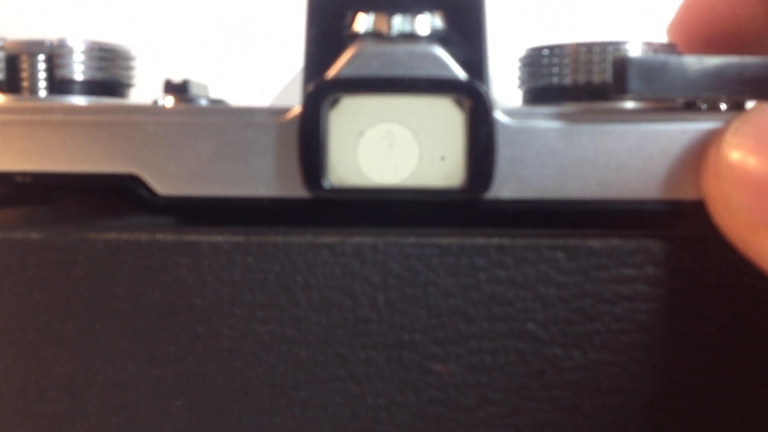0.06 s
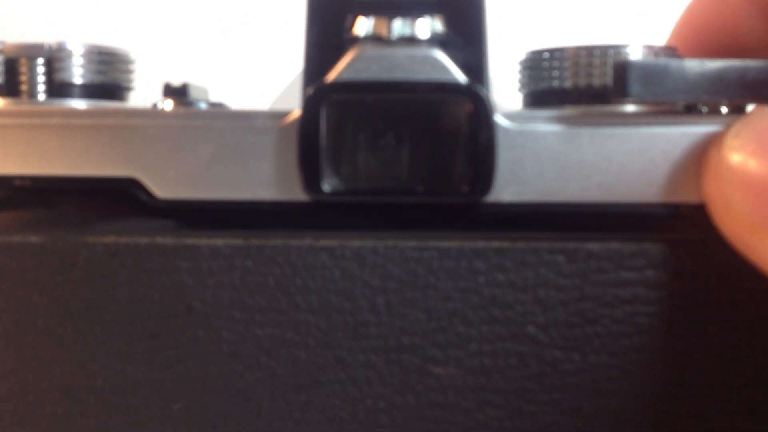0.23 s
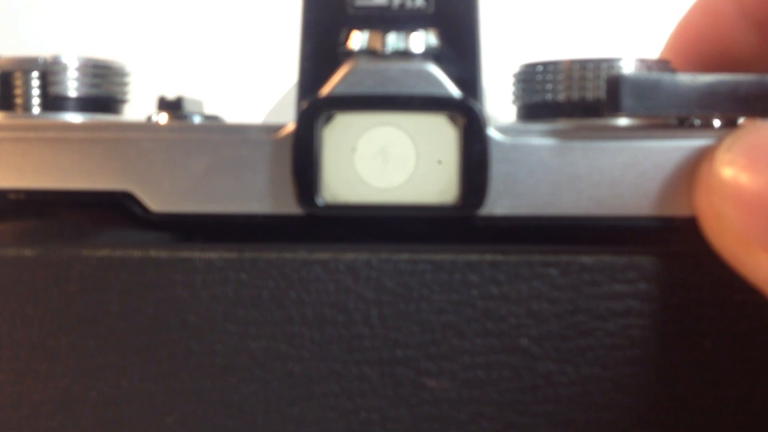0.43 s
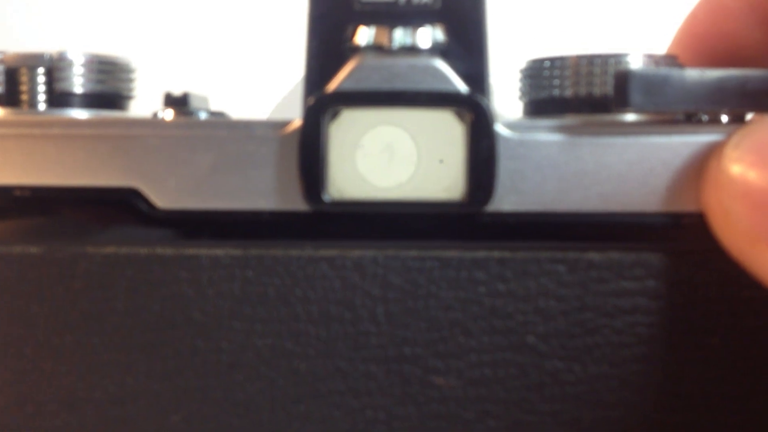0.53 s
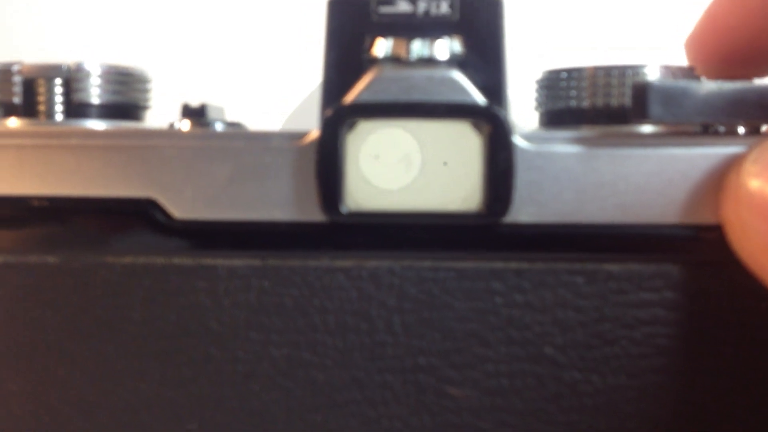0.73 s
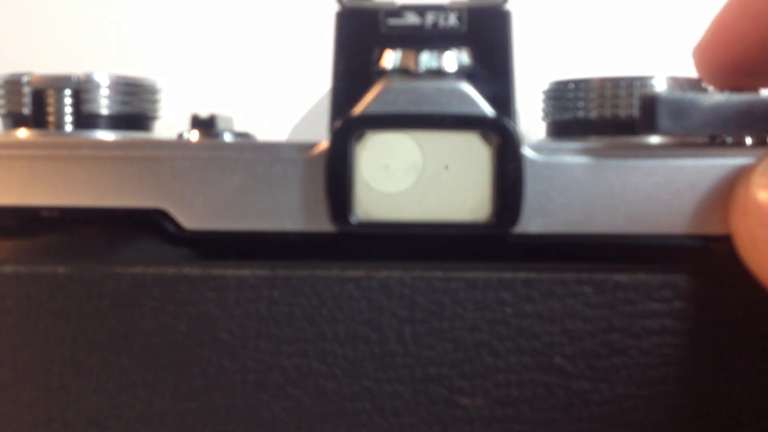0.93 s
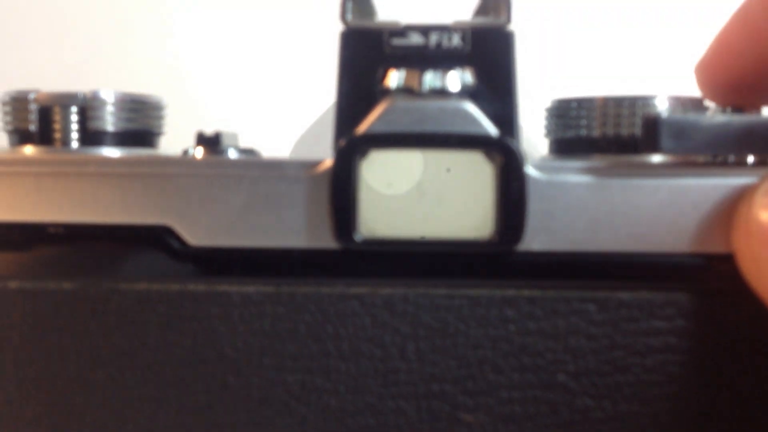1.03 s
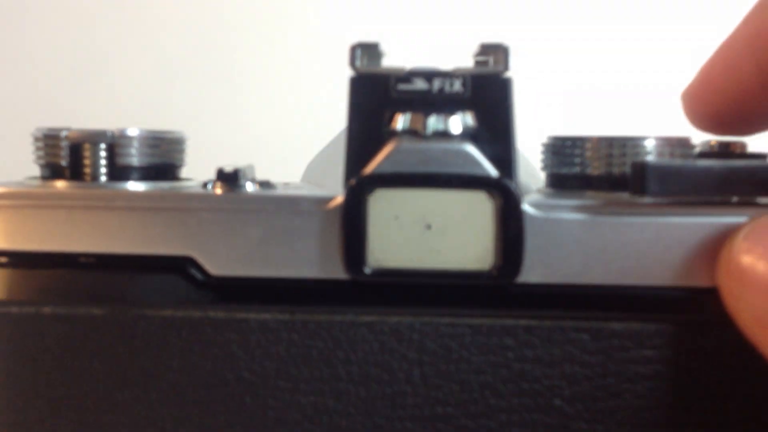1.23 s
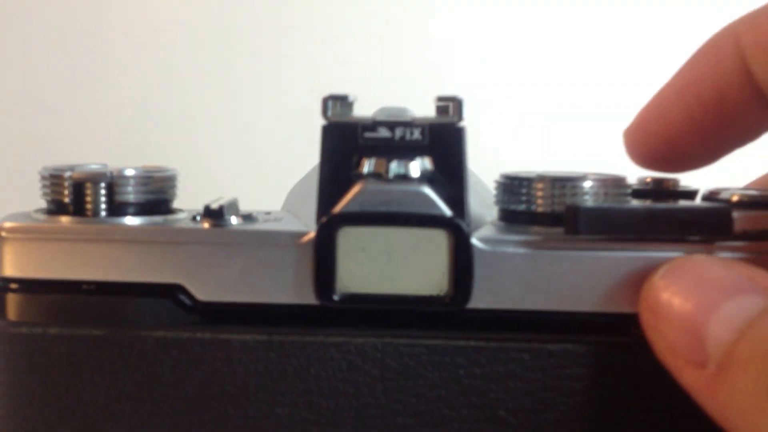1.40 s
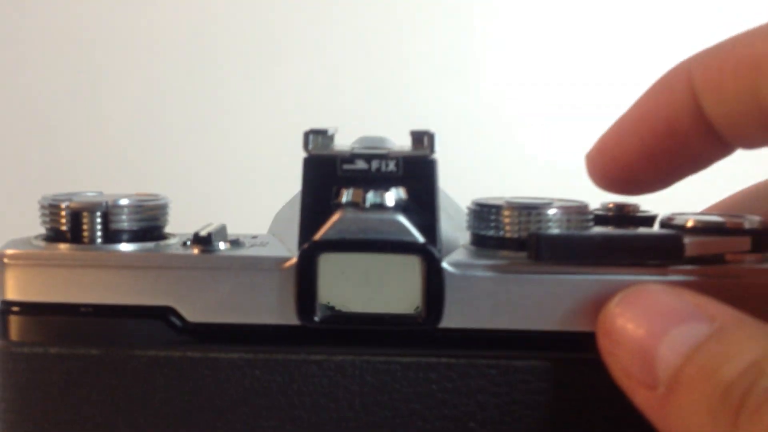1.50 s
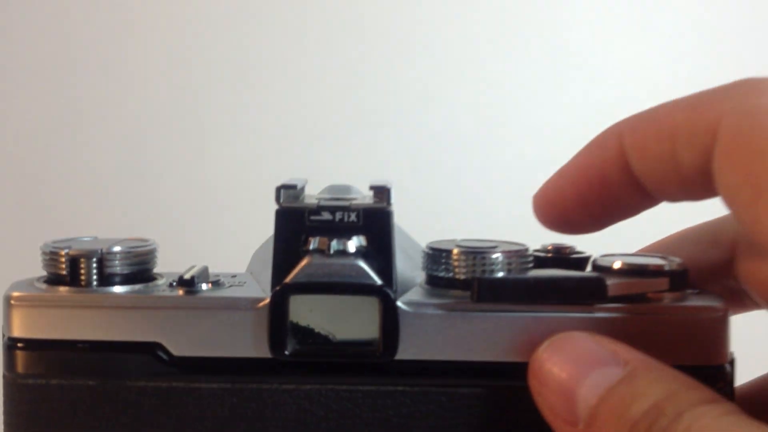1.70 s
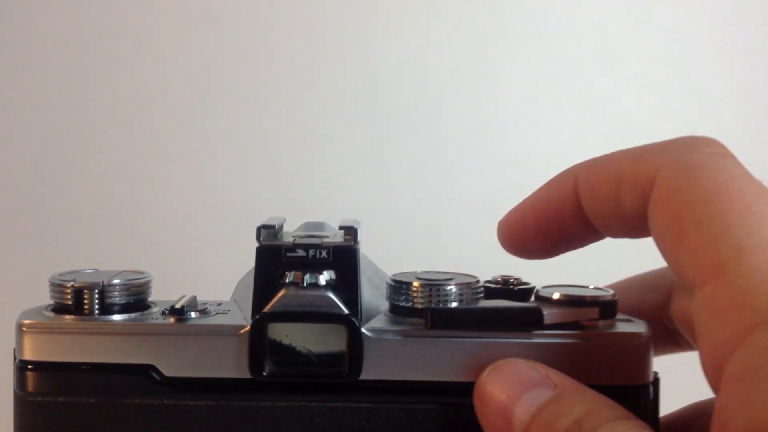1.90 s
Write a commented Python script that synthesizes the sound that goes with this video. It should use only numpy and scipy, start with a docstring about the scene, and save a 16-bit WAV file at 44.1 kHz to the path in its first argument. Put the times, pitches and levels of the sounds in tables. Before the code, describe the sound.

A film camera shutter fires with a loud metallic clack, then a lighter click follows

```python
"""Film camera shot in a small room

A film camera fires close to the microphone: the mirror flips up, the shutter runs and the mirror drops
back with a thump. The release button springs back with a lighter click, and fingers tick on the body
and nudge the advance lever. Each contact is a burst of filtered noise, a metal ring and a low thump.
Noise pulses make the gear whirr; noise and long tones make the return spring's shiver.
A noise tail makes the room, and an appliance hums quietly behind in sine tones over soft noise."""
import sys
import numpy as np
from scipy import signal
from scipy.fft import rfft, irfft, next_fast_len
from scipy.io import wavfile
from scipy.ndimage import uniform_filter1d

SR = 44100
rng = np.random.default_rng(int(sys.argv[2]) if len(sys.argv) > 2 else 0)


def bounce(signal):
    """Save signal as a 16-bit WAV file at the path given by the first command-line argument."""
    frames = np.transpose(np.atleast_2d(signal))
    limited = np.clip(frames, -1, 1)
    pcm = np.round(limited * 32767).astype(np.int16)
    wavfile.write(sys.argv[1], SR, pcm)


N = 85995  # length in samples


def amp(db):
    """Turn decibels into a gain."""
    return 10 ** (np.asarray(db) / 20)


def unit(x):
    """Scale to an rms of 1."""
    return x / np.sqrt(np.mean(x ** 2) + 1e-20)


def along(points, hz):
    """Read values between (pitch_hz, value) points on a log pitch axis."""
    point_hz, values = np.transpose(points)
    return np.interp(np.log(hz + 1), np.log(point_hz + 1), values)


def fade(t, t60):
    """Die away smoothly, falling 60 dB in t60 seconds."""
    return np.exp(-np.log(1000) * t / t60)


def causal(x, gain):
    """Minimum-phase filter, which responds as early as it can; gain spans 0 Hz to SR / 2."""
    size = 2 * (len(gain) - 1)
    cepstrum = irfft(np.log(gain + 1e-6))
    # fold the second half onto the first, so that nothing sounds before its cause
    cepstrum[1:size // 2] *= 2
    cepstrum[size // 2 + 1:] = 0
    response = np.exp(rfft(cepstrum))
    return irfft(rfft(x, size) * response)[:len(x)]


def coloured(x, spectrum):
    """Filter x to the shape of a spectrum, with a filter of unit power."""
    hz = np.fft.rfftfreq(2 * next_fast_len(len(x)), 1 / SR)
    return causal(x, unit(amp(along(spectrum, hz))))


def ring(modes, t, scatter_db):
    """Sum damped sines of alternating sign, each struck with a slightly random strength."""
    out = np.zeros(len(t))
    for k, (hz, db, t60) in enumerate(modes):
        strength = (-1) ** k * amp(db + scatter_db * rng.normal())
        out += strength * fade(t, t60) * np.sin(2 * np.pi * hz * t)
    return out


def add(track, s, sound):
    """Mix a sound into the track at s seconds."""
    i = int(s * SR)
    track[i:i + len(sound)] += sound[:len(track) - i]


# Appliance hum tones: pitch_hz, level_db (rms)
HUM_TONES = [(360, -90), (436, -87.5), (480, -78.5), (600, -85), (640, -88), (720, -72.5), (787, -92),
             (840, -85), (960, -91.5)]
# Colour of the soft room noise: pitch_hz, relative_level_db
AIR_COLOUR = [(25, -32.5), (75, -33.5), (130, -6.5), (230, -4), (330, -6.5), (450, -7), (700, -7.5),
              (950, -11.5), (1300, -11.5), (3000, -14.5), (6000, -14), (10000, -18.5), (12500, -14.5),
              (15000, -17)]
AIR_DB = -70


def background():
    """Steady hum tones, each starting at a random point of its cycle, over soft room noise."""
    t = np.arange(N) / SR
    hum = np.zeros(N)
    for hz, db in HUM_TONES:
        tone = np.sin(2 * np.pi * (hz * t + rng.random()))
        hum += np.sqrt(2) * amp(db) * tone  # sqrt(2) turns rms into peak
    return hum + amp(AIR_DB) * coloured(rng.standard_normal(N), AIR_COLOUR)


EVEN_HZ = 313  # a crack's spectrum is even over bands of this width


def burst(t, t60):
    """A dying burst of dense vibration, evened out so that it has no colour of its own."""
    noise = rng.standard_normal(len(t)) * fade(t, t60)
    power = np.abs(rfft(noise, 2 * len(t))) ** 2
    smooth_power = uniform_filter1d(power, int(2 * EVEN_HZ * len(t) / SR))
    return causal(noise, unit(np.abs(smooth_power) ** -.5))


# Contacts inside the camera: start_s, level_db, t60_s, thump_db (relative to level_db), part (a name)
CONTACTS = [ (0.1772, -51.5, 0.0347, -3.5, "finger"), (0.2160, -19, 0.04, -27.5, "mirror"),
            (0.2234, -14.5, 0.048, -31.5, "mirror"), (0.2290, -22.5, .04, -25, "mirror"),
            (0.2432, -37, .02, -27.5, "mirror"), (0.2532, -22.5, 0.023, -22.5, "mirror"),
            (0.2744, -10.5, .022, -30.5, "curtain"), (0.2767, -6, 0.013, -38, "curtain"),
            (0.3049, -18.5, 0.075, -31, "stop"), (0.3120, -11.5, 0.022, -17, "stop"),
            (0.3269, -20.5, 0.077, -10, "rebound"), (0.3353, -38, .025, -11, "rebound"),
            (0.423, -37, 0.028, -25.5, "tick"), (0.4400, -52, 0.036, -19.5, "tick"),
            (0.4865, -57.5, .1, -17.5, "finger"), (0.509, -60.5, .03, -7, "tick"),
            (0.6563, -29, 0.011, -25.5, "button"), (0.6580, -14.5, 0.014, -30.5, "button"),
            (0.6610, -19.5, 0.012, -39.5, "button"), (1.6640, -46, 0.011, -25.5, "tick"),
            (1.7280, -56.5, 0.022, -28, "tick"), (1.9025, -38, 0.075, -24, "lever"),
            (1.9250, -48.5, 0.13, -24, "lever")]
# Colour of each part's dense, short ring, by part name: pitch_hz, relative_level_db (per Hz)
PART_COLOURS = { "mirror": [(120, -29), (200, -13), (338, -21.5), (503, -5.5), (636, -10), (833, -4.5),
                (1260, -8.5), (1690, -11), (2130, -13.5), (2380, -3), (3540, -9), (3800, -4.5), (4720, -4),
                (5070, -6.5), (7020, -5), (8120, -13), (8720, -9), (13500, -11.5), (15000, -21)],
                "curtain": [(120, -46), (200, -19), (696, -17.5), (980, 1.5), (1240, -12), (1720, -11.5),
                (2290, 1), (3290, -6.5), (4010, -8), (4240, -9), (4720, 5), (5070, -6), (5450, 5.5),
                (5860, -5), (7830, -5.5), (9210, 0.5), (10600, -6.5), (11400, -2.5), (15000, -21)],
                "stop": [(120, -54.5), (200, -13), (459, -15), (696, -17), (1240, -11), (1910, -22),
                (2460, -13.5), (2700, -11.5), (3060, -9), (3540, -12), (4160, -13.5), (4550, 2.5),
                (5170, -26.5), (5450, -16), (7830, -13), (8880, -6.5), (9550, -14), (13500, -15),
                (15000, -32)], "rebound": [(120, -37.5), (200, -10.5), (963, -8), (1260, -5.5),
                (1980, -12.5), (2330, -7), (2700, -19), (3410, -19.5), (3730, 4.5), (4090, -10),
                (4550, -9.5), (7150, -4.5), (8260, -14), (12700, -11), (15000, -16.5)],
                "button": [(120, -46), (200, -16), (376, -30), (591, -25), (1070, 1), (1430, -11.5),
                (2060, 1), (2510, -6.5), (3120, -11), (3350, -12), (4090, -1), (4550, 1), (6080, -2.5),
                (6530, 1), (7020, -3.5), (9210, 1.5), (10300, -9), (11200, 0.5), (15000, -18)],
                "lever": [(88, -29.5), (150, -9), (416, -0.5), (612, -1.5), (772, -10.5), (1130, -4.5),
                (1670, -10), (2650, -6.5), (2920, -12.5), (4540, -0.5), (5100, -10), (6180, -11.5),
                (6680, -4.5), (8100, -8), (10800, -23), (12100, -18), (15000, -31)], "tick": [(200, -16.5),
                (1000, -8), (2000, -5.5), (3500, -1), (6000, -2.5), (10000, -7), (15000, -16.5)],
                "finger": [(150, -17.5), (700, -1.5), (1200, 8.5), (1800, -6.5), (2700, -4.5), (4000, -8),
                (6000, -11), (14000, -24)]}
# Ring of the metal top plate and springs: pitch_hz, level_db (relative to the contact), t60_s
METAL_MODES = [(1423, -29, 0.11), (2351, -39, 0.088), (3070, -32.5, 0.069), (3743, -31.5, .09),
               (4300, -43.5, .12), (4480, -34, .11), (4540, -37.5, 0.1), (4735, -35.5, .1),
               (5620, -34.5, .09), (8340, -38, .1), (8630, -32.5, .11)]
# Low tones of the hollow body: pitch_hz, level_db (relative to the thump), t60_s
BODY_MODES = [(131.3, -5.5, 0.1), (155.7, -4, 0.095), (209.4, -10, 0.17), (334.9, -21, 0.24),
              (393, -20.5, .2), (447, -13.5, .25), (571, -7, 0.052)]
ATTACK_S, THUMP_ATTACK_S = 0.000398, 0.0034  # time constants of the rise


def contacts():
    """Each contact is a crack in its part's colour, a metal ring and a slower-rising thump of the body."""
    out, t = np.zeros(N), np.arange(SR // 2) / SR
    attack = 1 - np.exp(-t / ATTACK_S)
    thump_attack = 1 - np.exp(-t / THUMP_ATTACK_S)
    for s, db, t60, thump_db, part in CONTACTS:
        crack = coloured(burst(t, t60), PART_COLOURS[part])
        metal = ring(METAL_MODES, t, scatter_db=0.5)
        thump = amp(thump_db) * ring(BODY_MODES, t, scatter_db=0.1) * thump_attack
        add(out, s, amp(db) * ((crack + metal) * attack + thump))
    return out


# the timing gears run while the shutter is open
GEAR_START_S, GEAR_STOP_S, GEAR_RATE_HZ = .238, .303, 330
GEAR_DB, GEAR_T60_S = -35, 0.017


def gears():
    """A brief whirr: slightly uneven tooth clicks swell and fade a noise in the mirror's colour."""
    drive, t = np.zeros(N), np.arange(SR // 20) / SR
    for k, (late, size) in enumerate(rng.random((64, 2))):
        s = GEAR_START_S + (k + late / 2) / GEAR_RATE_HZ  # up to half a click late
        if s < GEAR_STOP_S:
            add(drive, s, (.5 + size) * fade(t, GEAR_T60_S))
    whirr = drive * rng.standard_normal(N)
    return amp(GEAR_DB) * coloured(whirr, PART_COLOURS["mirror"])


# Faint, long tones of the return spring: pitch_hz, level_db (starting peak), t60_s
SPRING_TONES = [(433, -62.5, 1.2), (641, -65, 1.6), (788, -66.5, 1.2), (2125, -58, .6)]
# Colour of the spring's shiver: pitch_hz, relative_level_db (per Hz)
SPRING_COLOUR = [(100, -7.5), (200, -5.5), (450, -2), (700, -8), (1200, 0.5), (1800, -7.5), (2400, -7.5),
                 (4500, -1), (6000, -4), (9000, -3), (15000, -14.5)]
SPRING_START_S, SHIVER_DB, SHIVER_T60_S = .33, -41.5, 0.3


def spring():
    """The return spring shivers densely after the mirror drops, then sings faintly in a few long tones."""
    out, t = np.zeros(N), np.arange(SR) / SR
    noise = rng.standard_normal(len(t)) * fade(t, SHIVER_T60_S)
    shiver = amp(SHIVER_DB) * coloured(noise, SPRING_COLOUR)
    add(out, SPRING_START_S, shiver + ring(SPRING_TONES, t, scatter_db=0))
    return out


# How long the room rings: pitch_hz, t60_s
ROOM_T60 = [(130, 0.34), (500, 0.26), (2000, 0.22), (8000, 0.14), (15000, 0.16)]
# Colour of the room's tail: pitch_hz, relative_level_db
ROOM_COLOUR = [(100, -2), (500, 1), (2000, 3), (8000, -1), (15000, -2)]
ROOM_DB, ROOM_DELAY_S = -14, .008


def room(x):
    """The small room's short tail: noise in which each frequency dies at its own speed."""
    hz, t, bands = signal.stft(rng.standard_normal(SR // 2), SR, nperseg=256)
    band_t60 = along(ROOM_T60, hz)[:, None]
    tail = signal.istft(bands * fade(t, band_t60), SR)[1]
    tail = coloured(tail, ROOM_COLOUR)
    tail = tail / np.linalg.norm(tail)
    tail = np.pad(tail, (int(ROOM_DELAY_S * SR), 0))
    return amp(ROOM_DB) * signal.fftconvolve(x, tail)[:N]


def scene():
    """Mix the camera, its room and the background into one channel."""
    camera = contacts() + gears() + spring()
    return (camera + room(camera) + background())[None]


LOW_CUT_HZ, TOP_HZ = 60, 15450


def record(dry):
    """The recorder cuts the deep bass and keeps almost nothing above its band limit."""
    low_cut = signal.butter(2, LOW_CUT_HZ, "high", fs=SR, output="sos")
    band_limit = signal.ellip(10, .2, 80, TOP_HZ, fs=SR, output="sos")  # 0.2 dB ripple, 80 dB cut
    thin = signal.sosfilt(low_cut, dry)
    return signal.sosfilt(band_limit, thin)


dry = scene()
out = record(dry)
bounce(out)
```